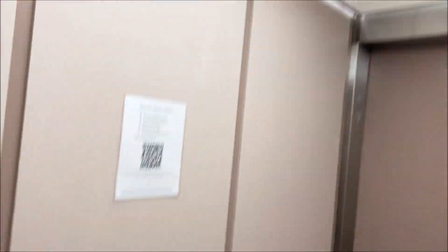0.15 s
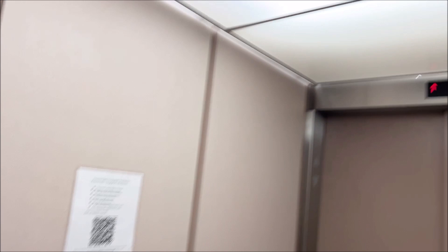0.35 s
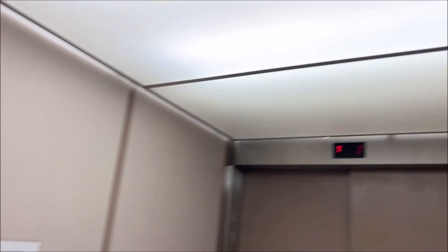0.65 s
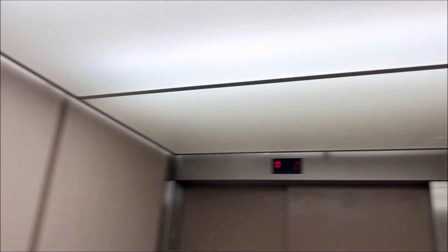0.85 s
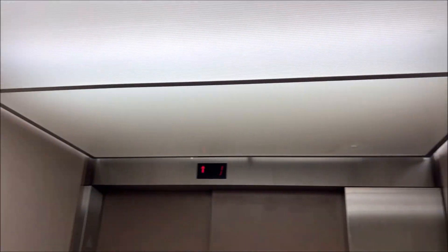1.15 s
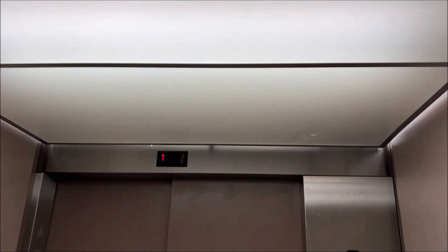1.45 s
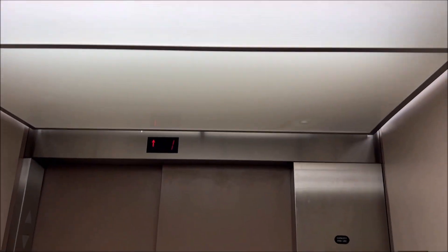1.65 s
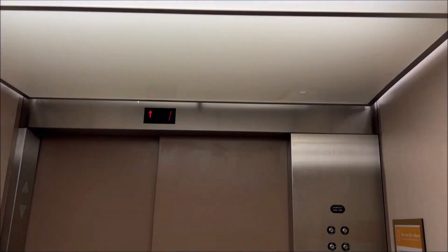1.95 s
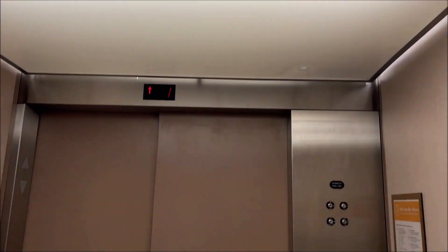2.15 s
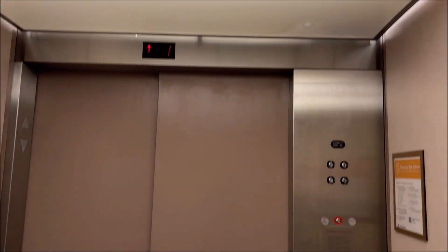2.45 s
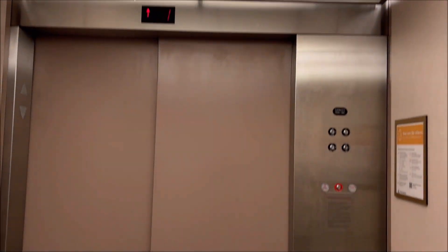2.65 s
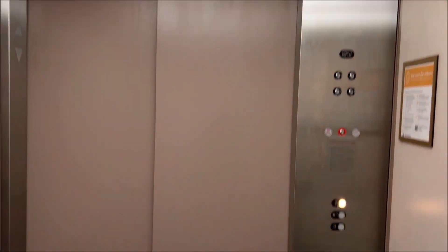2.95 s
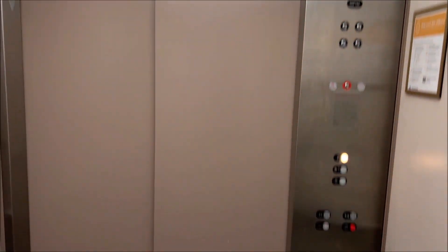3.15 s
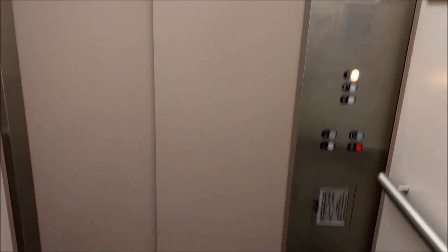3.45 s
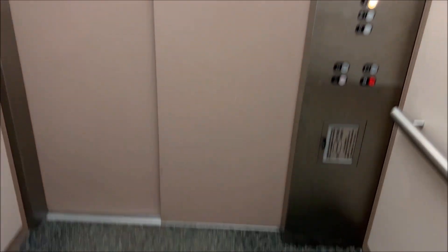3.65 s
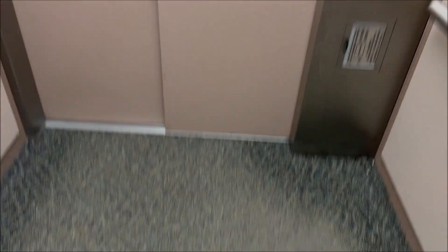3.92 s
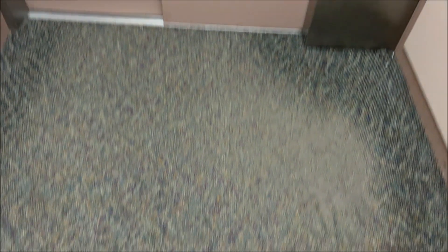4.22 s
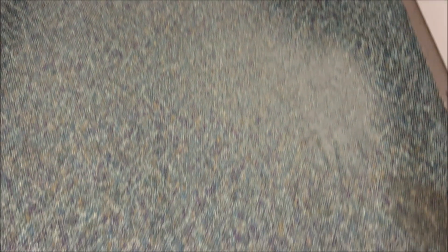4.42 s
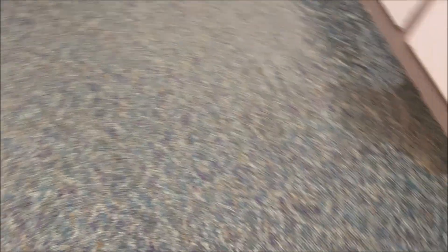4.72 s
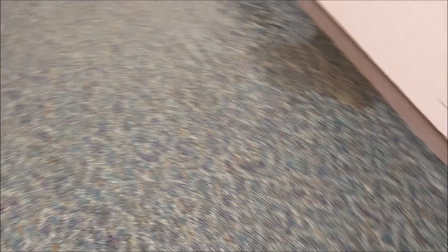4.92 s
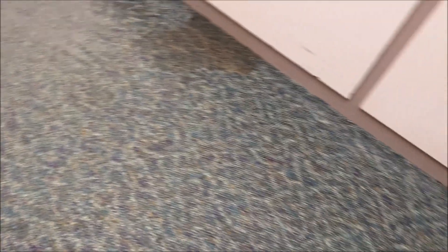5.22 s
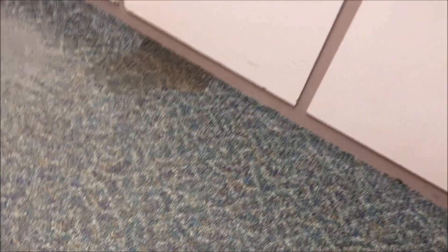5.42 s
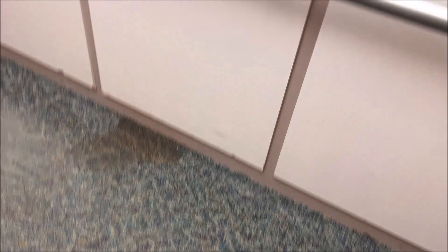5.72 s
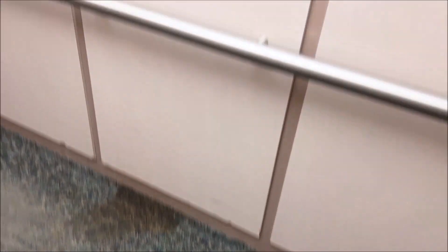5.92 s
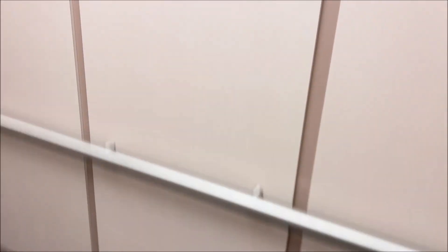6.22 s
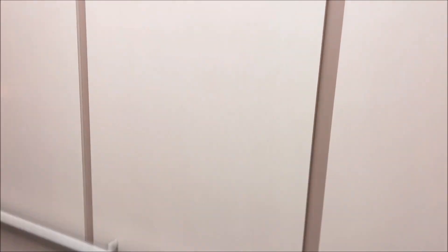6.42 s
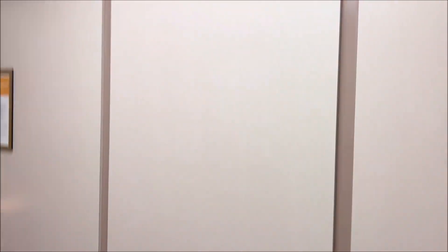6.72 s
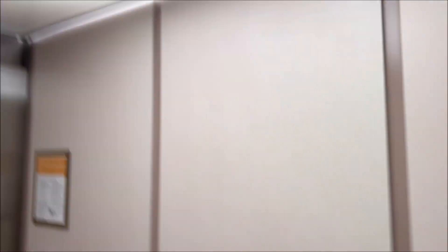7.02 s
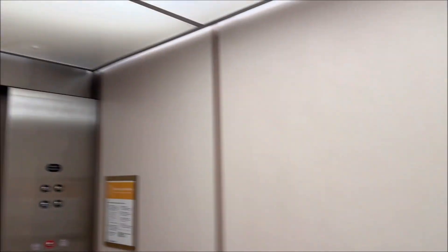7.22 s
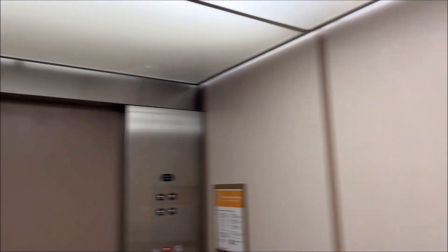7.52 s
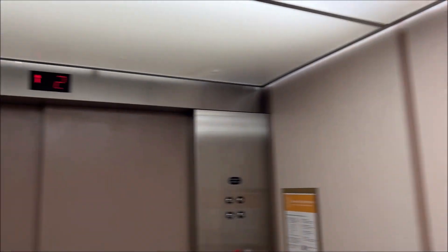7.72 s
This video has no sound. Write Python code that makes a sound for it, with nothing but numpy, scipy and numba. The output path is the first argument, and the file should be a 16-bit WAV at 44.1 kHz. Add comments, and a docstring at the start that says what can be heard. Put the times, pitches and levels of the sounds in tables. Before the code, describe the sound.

Inside a moving elevator, a low droning hum swells and fades over rumble, with soft rustling and some light clicks near the end.

```python
"""Riding a lift up

Inside the closed car a hand-held phone turns about. The screw pump, a second machine and the mains hum
through the walls; pump and machine swell and fade as the phone crosses the car's standing waves.
The grip ticks on the phone case, small metal things chink, clothes rustle and nearly squeak.
Behind it all, air and rails rumble and hiss."""
import sys
import numpy as np
from scipy import signal
from scipy.io import wavfile
from scipy.ndimage import uniform_filter1d
from numba import njit

SR = 44100
rng = np.random.default_rng(int(sys.argv[2]) if len(sys.argv) > 2 else 0)


def waveform_to_disk(signal):
    """Save audio, clipped to [-1, 1], as 16-bit WAV at the path in sys.argv[1]."""
    frames = np.transpose(np.atleast_2d(signal))
    scaled = np.clip(frames, -1, 1) * 32767
    samples = np.round(scaled).astype(np.int16)
    wavfile.write(sys.argv[1], SR, samples)


N = 347067
SHAFT_HZ, MACHINE_HZ, MAINS_HZ = 58.74, 74.85, 60


def undb(db):
    return 10 ** (np.asarray(db) / 20)


def unit(x):
    return x / np.sqrt(np.mean(x ** 2))


def unit_peak(x):
    return x / np.abs(x).max()


def curves(table):
    """Automation lanes: each column after the time, one value a sample."""
    times, *columns = np.transpose(table)
    return [np.interp(np.arange(N) / SR, times, column) for column in columns]


def panned(x, pan_db):
    """Pan is the left level minus the right."""
    return x * undb(np.array([pan_db, -pan_db]).reshape(2, -1) / 2)


def antiphase(x):
    return x * np.array([[1], [-1]])


@njit
def svf(x, hz, width):
    """State-variable band-pass, gain 1 at the centre."""
    y, band_state, low_state = np.empty(len(x)), 0., 0.
    g, damping = np.tan(np.pi * hz / SR), width / hz
    for i in range(len(x)):
        v = (band_state + g * (x[i] - low_state)) / (1 + g * (g + damping))
        band_state = 2 * v - band_state
        low_state += 2 * g * v
        y[i] = damping * v
    return y


def bandpass(x, hz, width, passes=1):
    for _ in range(passes):
        x = svf(x, float(hz), float(width))
    return x


def stereo_band(hz, width, correlation):
    """A band of noise with the given likeness of left and right."""
    correlation = np.clip(correlation, -.99, .999)
    mid, side = (unit(bandpass(rng.standard_normal(N), hz, width, passes=2)) for _ in range(2))
    return np.sqrt((1 + correlation) / 2) * mid + np.sqrt((1 - correlation) / 2) * antiphase(side)


def wander(rate):
    """Random levels held 1 / rate s and slewed twice; spread near 1."""
    hold = int(SR / rate)
    steps = np.repeat(rng.standard_normal(N // hold + 1), hold)
    return 1.58 * uniform_filter1d(uniform_filter1d(steps, hold), hold)[:N]


def blotches(shape, bins, frames):
    """A random spectrogram, smoothed over frequency and time; rms 1."""
    smeared = uniform_filter1d(rng.standard_normal(shape), bins, axis=-2)
    return unit(uniform_filter1d(smeared, frames, axis=-1))


def add(out, start_s, x):
    i = int(start_s * SR)
    out[:, i:i + x.shape[1]] += x[:, :N - i]


def pump():
    """Clean orders of the shaft rate; the speed wavers a hair and oil noise rings the wall modes."""
    # main tone (4th order) where the phone is: t/s, level/dB, pan/dB
    main_tone = [(0, -34.5, -3), (.1, -40.5, -4.5), (.165, -45, -9), (.22, -32, -3.5), (.35, -35.5, 1),
                 (.62, -35, 2), (.7, -44, -6), (.8, -57, 14), (.91, -42, 10.5), (.97, -46.5, 8),
                 (1.07, -42, 5), (1.3, -50, 14), (1.45, -41, 10), (1.75, -40, 2.5), (2.1, -42.5, 1.5),
                 (2.33, -41.5, 3.5), (2.75, -45.5, -3.5), (2.92, -53, -8), (3.08, -46, -4.5),
                 (3.15, -36.5, -1.5), (3.25, -34, 0.5), (3.34, -34.5, -2), (3.4, -35, -1.5), (3.52, -30, 0),
                 (3.63, -34, -1), (3.72, -32, 0), (3.87, -34.5, 0), (3.94, -33.5, 1), (4.1, -33.5, 1.5),
                 (4.18, -33.5, 1), (4.22, -41, -4), (4.27, -35, -2), (4.31, -34.5, 1), (4.42, -30, 2),
                 (4.51, -29, 0), (4.58, -29.5, 1), (4.66, -27.5, 0.5), (4.78, -31, 0.5), (4.92, -27, 1),
                 (5.35, -30, 1.5), (5.72, -36, 1.5), (5.87, -43, -2), (6.05, -40, 0), (6.22, -36, 0),
                 (6.35, -42, 2), (6.43, -36, 1), (6.55, -35.5, 1), (6.7, -38, -0.5), (6.74, -38.5, 0),
                 (6.79, -49, 0), (6.85, -42, -1), (6.95, -46, -2), (7.35, -49, 1), (7.87, -44.5, 9)]
    # weaker tones: t/s, 2nd order/dB, 8th order/dB
    weak_tones = [(0, -58, -65), (.5, -46.5, -82), (.95, -57, -61), (1.65, -45, -55), (1.85, -50.5, -69.5),
                  (2.35, -45.5, -55.5), (2.6, -58.5, -71), (2.85, -48.5, -54), (3.3, -42.5, -48),
                  (3.7, -55, -49.5), (3.92, -57, -76), (4.2, -59, -50), (4.62, -52.5, -45),
                  (5, -50.5, -50.5), (5.2, -58.5, -49), (5.4, -62, -51.5), (5.65, -70, -59.5),
                  (6, -70, -54), (6.5, -52, -56), (6.95, -46, -79), (7.25, -53.5, -54),
                  (7.87, -44.5, -66.5)]
    # oil noise in the wall mode under each order: f/Hz, width/Hz, level/dB
    oil_modes = [(114.6, 30, -53), (231.8, 9.9, -53), (466.3, 4.8, -73)]
    # part of orders 2, 4 and 8 that is opposite at the two mics: level/dB, phase/rad, drift/(rad/s)
    side_tones = [(-56.5, 3.6, -.4), (-58, 1.9, -0.49), (-70, 1.3, .3)]
    t = np.arange(N) / SR
    shaft_angle = 2 * np.pi * np.cumsum(SHAFT_HZ * (1 + 0.00059 * wander(3.4))) / SR
    main_db, main_pan_db = curves(main_tone)
    low_db, high_db = curves(weak_tones)
    out = sum(undb(db + 0.5 * wander(4)) * stereo_band(hz, width, .9) for hz, width, db in oil_modes)
    tones = ((2, low_db, 0), (4, main_db, main_pan_db), (8, high_db, 0))
    for (order, db, pan_db), (side_db, phase, drift) in zip(tones, side_tones):
        common = undb(db + 0.14 * wander(5.5) + 0.4 * wander(12)) * np.sin(order * shaft_angle)
        side = undb(side_db) * np.sin(order * shaft_angle + phase + drift * t)
        out += np.sqrt(2) * (panned(common, pan_db) + antiphase(side))
    # the 4th mains harmonic shares the main tone's standing wave and beats with it
    beat_phase = 2 * np.pi * 4 * (MAINS_HZ - SHAFT_HZ) * (t - 4.92)  # in step at 4.92 s
    return out + np.sqrt(2) * undb(main_db - 18) * np.sin(4 * shaft_angle + beat_phase)


def hums():
    """Shaft, machine and mains tones blurred by the wall modes they excite, over the car's boom."""
    # hum at the phone: t/s, shaft/dB, second machine/dB, its 5th order/dB, boom/dB
    levels = [(0.05, -41.5, -41.5, -75, -39.5), (0.59, -51, -45.5, -69, -43.5),
              (0.87, -44, -37, -57.5, -38.5), (1.15, -56, -40.5, -57, -39.5), (1.28, -39, -56, -61, -39),
              (2.08, -59.5, -38, -58, -43), (2.23, -50, -48, -68, -42), (2.34, -54, -42, -71, -47),
              (2.72, -54, -41.5, -64, -36.5), (2.88, -50, -48, -56, -37.5), (3.05, -57, -42.5, -64, -40.5),
              (3.5, -52, -49, -58.5, -42), (4.19, -48.5, -70, -57.5, -51.5), (4.3, -51.5, -50, -71, -44),
              (5.25, -55, -55, -59, -46.5), (5.5, -52.5, -50.5, -48, -45.5),
              (6.15, -48.5, -59.5, -55, -48.5), (6.45, -52, -52, -71, -40.5), (6.91, -62, -36, -55.5, -44),
              (7.15, -57, -41.5, -48.5, -44), (7.5, -55, -43.5, -48, -47), (7.8, -47, -48, -52.5, -49)]
    # wall-mode noise, one entry a tone: share of the power, width/Hz, left-right correlation
    noise_shares = [0.079, 0.19, 0.15, 0.15]
    widths = [7, 13, 3.9, 9.4]
    correlations = [0.86, 1, 0.33, 0.34]
    # low and upper air modes of the car: f/Hz, width/Hz, relative level/dB
    low_modes = [(29.8, 27, -6), (52.3, 6.8, -1), (79.4, 17.7, 4.5)]
    upper_modes = [(145.3, 33, 1.5), (180.6, 6.6, -8.5)]
    shaft_db, machine_db, fifth_db, boom_db = curves(levels)
    t, out = np.arange(N) / SR, np.zeros((2, N))
    tones = ((SHAFT_HZ, shaft_db), (MACHINE_HZ, machine_db),
             (5 * MACHINE_HZ, fifth_db), (6 * MAINS_HZ, -63.5))
    for (hz, db), share, width, correlation in zip(tones, noise_shares, widths, correlations):
        tone = np.sqrt(2 * (1 - share)) * np.sin(2 * np.pi * hz * t)
        out += undb(db) * (tone + np.sqrt(share) * stereo_band(hz, width, correlation))
    # the machine's 3rd order beats with the main pump tone
    out += np.sqrt(2) * undb(machine_db - 10) * np.sin(2 * np.pi * 3 * MACHINE_HZ * t)
    boom = sum(undb(db) * stereo_band(hz, width, .998) for hz, width, db in low_modes)
    upper_boom = sum(undb(db) * stereo_band(hz, width, .85) for hz, width, db in upper_modes)
    return out + undb(boom_db) * unit(boom) + undb(-49.5 - 0.5 * wander(1.6)) * unit(upper_boom)


def grip_ticks():
    """The grip on the phone: a short crack, then a knock of a few cycles in the case."""
    # ticks: t/s, knock peak/dB, knock f/Hz, crack peak/dB, crack f/Hz, knock pan/dB
    hits = [(5.143, -62, 2500, -58, 4000, 5), (5.349, -43, 1000, -67, 4000, -8),
            (6.466, -39, 850, -38.5, 3180, -6), (6.5182, -33, 1220, -39, 4640, -8),
            (6.5412, -38, 1090, -56, 5000, 0), (6.756, -42, 1000, -62, 2500, -6),
            (6.956, -44, 1880, -31, 5260, 22), (6.9569, -38, 607, -25.5, 9600, -3),
            (6.9755, -60, 700, -49, 11000, 0), (7.014, -31.5, 560, -46, 5000, 8),
            (7.019, -54, 715, -46, 6000, 6), (7.025, -56, 900, -48, 4500, 8),
            (7.030, -47, 1230, -44, 7000, 17), (7.0452, -38, 600, -42, 7200, 6),
            (7.072, -53, 1200, -61, 6000, 8), (7.0887, -52, 1510, -40.5, 4500, 20),
            (7.109, -42, 2200, -43, 5500, 20), (7.111, -47, 2170, -45, 5030, 20),
            (7.1125, -50, 2500, -52, 4500, 22), (7.114, -46, 1650, -48, 4000, 33),
            (7.1169, -45, 1500, -30, 2620, 16), (7.118, -28.5, 646, -43, 2500, 13),
            (7.1205, -40, 744, -41, 3000, -3), (7.1248, -34, 510, -40, 6000, 4),
            (7.393, -49, 1400, -59, 3000, -11)]
    t, out = np.arange(int(.25 * SR)) / SR, np.zeros((2, N))
    for start_s, knock_db, knock_hz, crack_db, crack_hz, pan_db in hits:
        shared, *per_mic = rng.standard_normal((3, len(t))) * np.exp(-t / .0004)
        crack = np.array([bandpass(shared + 0.45 * own, crack_hz, 2.4 * crack_hz, passes=3)
                          for own in per_mic])
        cycles = knock_hz * t
        envelope = np.minimum(1.3 * cycles, 1) * 1000. ** (-cycles / 6)  # 60 dB down in six cycles
        knock = envelope * np.sin(2 * np.pi * cycles)
        add(out, start_s, panned(undb(knock_db) * unit_peak(knock), pan_db))
        add(out, start_s, panned(undb(crack_db) * unit_peak(crack), 0.78 * pan_db))
    return out


def metal_chinks():
    """Faint metal touches heard mostly through the car's echo: fading hiss on the metal's modes."""
    # touches: t/s, peak/dB, band centre f/Hz, pan/dB
    touches = [(0.917, -53, 6600, 5), (1.3044, -76, 6230, 14), (1.69, -70, 6900, 8), (1.863, -60, 6970, 6),
               (1.917, -59.5, 6860, 9), (2.0014, -64, 6700, 11), (2.283, -67, 7460, 6),
               (2.333, -68, 6900, 9), (2.5671, -67, 6850, 6), (2.654, -52, 7380, 5), (2.69, -56, 8000, 4.0),
               (2.792, -53, 8960, 3), (3.113, -52, 8040, 4), (3.144, -54.5, 6940, 4.5),
               (3.409, -57, 6940, 5), (3.58, -65, 5970, 13), (4.03, -59, 6620, 6), (4.7303, -58, 6360, 3)]
    # modes of the metal: f/Hz, width/Hz, relative level/dB
    modes = [(5400, 220, 9.5), (6060, 130, 7), (6950, 120, 5.5), (7770, 110, 1.5), (8430, 130, -1.5),
             (9070, 170, 3.5)]
    t, out = np.arange(int(.25 * SR)) / SR, np.zeros((2, N))
    car_t60_s = 0.28
    envelope = np.minimum(t / .003, 1) * 1000. ** (-t / car_t60_s)
    for start_s, db, centre_hz, pan_db in touches:
        channels = []
        for hiss in rng.standard_normal((2, len(t))):
            metal = sum(undb(mode_db) * bandpass(hiss, hz, width) for hz, width, mode_db in modes)
            chink = bandpass(unit(metal) + undb(3) * hiss, centre_hz, width=5000)
            channels.append(envelope * unit(bandpass(chink, hz=8000, width=4500)))
        add(out, start_s, undb(db) * panned(unit_peak(np.array(channels)), pan_db))
    return out


def clothes():
    """Cloth slips in quick uneven patches: a bright rustle with a scrape and a low rub under it."""
    # clothes and shoes rubbing: t/s, bright rustle/dB, scrape/dB, low rub/dB, port band pan/dB
    rustle = [(0, -75, -70, -65.5, 20.5), (.87, -79, -71.5, -66, 18.5), (1.01, -86, -79, -66, 22),
              (1.3, -83.5, -78, -72, 21), (1.42, -91, -77, -77, 21), (1.82, -91, -82, -72, 20),
              (2.5, -95, -83, -73, 20), (2.95, -88.5, -76, -68, 22.5), (3.3, -82, -75, -73.5, 20),
              (3.62, -83.5, -80, -77, 21), (3.8, -79, -76.5, -76, 18), (4.21, -76.5, -82.5, -69.5, 16),
              (4.74, -75, -78, -74, 13), (4.95, -75, -66, -63.5, 14), (5.2, -77, -75, -65, 10),
              (5.4, -76, -74, -65, 10), (6.1, -76, -75, -66, 10), (6.3, -79, -84.5, -72, 26),
              (6.45, -77, -76, -62, 14), (6.68, -71, -69, -62.5, -1), (6.85, -72.5, -86, -61, 9),
              (7.1, -75, -64, -77, 19), (7.41, -75.5, -93, -76, 7), (7.87, -79, -78, -80, 11)]
    # single brushes of cloth: t/s, bright rustle/dB, scrape/dB, rise/s, fall/s
    brushes = [(0.765, -72, -82, 0.067, 0.085), (0.92, -88, -66.5, 0.033, 0.093),
               (1.5, -83.5, -85, 0.044, 0.11), (3.918, -88, -87.5, 0.066, 0.041),
               (4.265, -80, -63, 0.019, 0.094), (5.05, -71.5, -64, 0.042, .04),
               (5.475, -65, -65, .03, .045), (6.6, -74.5, -79, 0.12, 0.058), (6.82, -83, -70, 0.066, 0.042),
               (7.03, -76, -74, 0.022, 0.02), (7.4, -77, -74, 0.066, 0.19)]
    *levels_db, pan_db = curves(rustle)
    bright_gain, scrape_gain, rub_gain = (undb(db + .6 * wander(6.7)) for db in levels_db)
    for peak_s, bright_db, scrape_db, rise_s, fall_s in brushes:
        since_peak = np.arange(N) / SR - peak_s
        stroke = np.exp(-(since_peak / np.where(since_peak > 0, fall_s, rise_s)) ** 2)
        bright_gain += undb(bright_db) * stroke
        scrape_gain += undb(scrape_db) * stroke
    # only the band of the port resonance favours one microphone
    port_band = panned(stereo_band(6380, 2800, 0.09), pan_db)
    bright = port_band + undb(-1.5) * stereo_band(8550, 3800, .1) + undb(1) * stereo_band(4300, 3700, .1)
    scrape = unit(stereo_band(2270, 720, 0.089) + undb(-7.5) * stereo_band(3370, 1100, 0.1))
    rub = stereo_band(1323, 380, 0.087)
    flicker = undb(1.3 * wander(40))
    return flicker * (bright_gain * bright + scrape_gain * scrape + rub_gain * rub)


def whistly_rubs():
    """Narrow noise where a sole or sleeve slides and nearly squeaks."""
    # slides: t/s, level/dB, f/Hz, length/s, pan/dB
    slides = [(4.76, -66.5, 2450, 0.089, 0), (4.896, -61, 2490, 0.11, -3), (5.045, -65, 2580, 0.14, 0),
              (6.62, -68, 8250, 0.12, -10), (6.63, -79, 5200, .06, -3), (6.68, -61, 1250, 0.053, -3)]
    t, out = np.arange(N) / SR, np.zeros((2, N))
    for peak_s, db, hz, length_s, pan_db in slides:
        swell = np.exp(-(2 * (t - peak_s) / length_s) ** 2)
        out += undb(db) * swell * panned(stereo_band(hz, 0.19 * hz, .2), pan_db)
    return out


def air_and_rails():
    """Fan and rail noise with faint, narrow peaks that drift at random."""
    # colour of the noise: f/Hz, relative density/dB
    spectrum = [(110, -29), (180, -18), (216, -12), (239, -10.5), (262, -14.5), (310, -14), (376, -17.5),
                (423, -20), (468, -21), (517, -22), (773, -29), (2410, -39.5), (2900, -48), (4800, -58),
                (6710, -56), (8300, -68.5), (9860, -71.5), (12800, -99), (21700, -120)]
    # stereo image: f/Hz, left-right correlation
    image = [(60, 1), (120, -1.1), (250, 0.79), (520, 0.23), (1080, -0.0072), (2220, -0.1), (4570, 0.25),
             (9410, 0.86)]
    hz, _, noise = signal.stft(rng.standard_normal((2, N)), SR, nperseg=4096)
    log_hz = np.log(np.maximum(hz, 1))[:, None]
    colour_db, correlation = (np.interp(log_hz, np.log(points_hz), values)
                              for points_hz, values in (np.transpose(spectrum), np.transpose(image)))
    correlation = np.clip(correlation, -.99, .999)
    narrow_peaks_db = 2.55 * blotches(noise.shape, bins=3, frames=7)
    patches_db = blotches(noise.shape[1:], bins=60, frames=3)
    noise *= undb(colour_db + narrow_peaks_db + patches_db)
    mid, side = noise[0] * np.sqrt(1 + correlation), noise[1] * np.sqrt(1 - correlation)
    bed = signal.istft(np.array([mid + side, mid - side]), SR, nperseg=4096)[1][:, :N]
    return undb(-45.5 + 0.13 * wander(0.63)) * panned(unit(bed), 1.1)


def scene():
    """The drone of the ride, with the passenger's small noises on top."""
    drone = pump() + hums() + air_and_rails()
    return drone + clothes() + whistly_rubs() + metal_chinks() + grip_ticks()


def record(dry):
    """The mics lose a step of treble above their port resonance and hiss; the phone cuts the top."""
    shelf_hz, shelf_db, top_hz = 9320, -14, 15700
    body = signal.sosfiltfilt(signal.butter(8, shelf_hz, fs=SR, output="sos"), dry)
    treble = undb(shelf_db) * (dry - body)
    hiss = undb(-92.5) * rng.standard_normal(dry.shape)
    return signal.sosfilt(signal.ellip(8, .2, 70, top_hz, fs=SR, output="sos"), body + treble + hiss)


dry = scene()
out = record(dry)
waveform_to_disk(out)
```